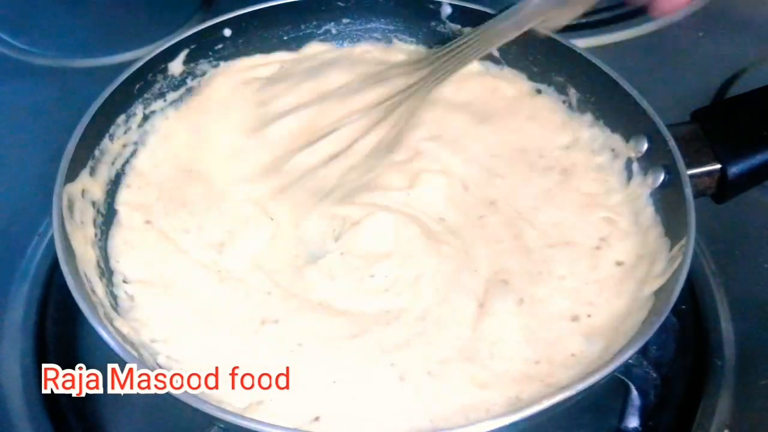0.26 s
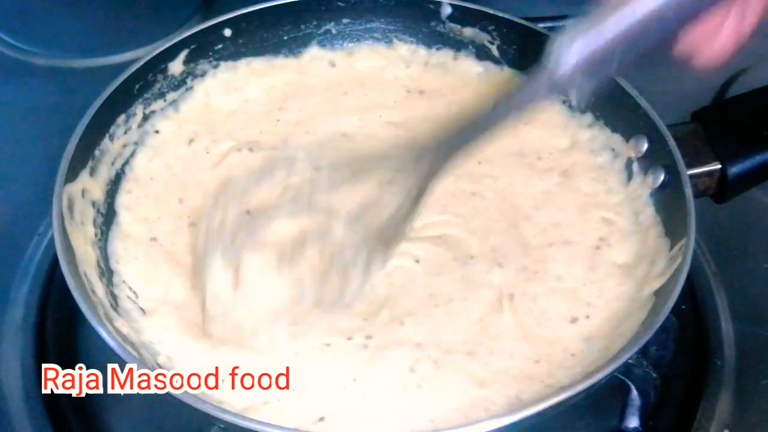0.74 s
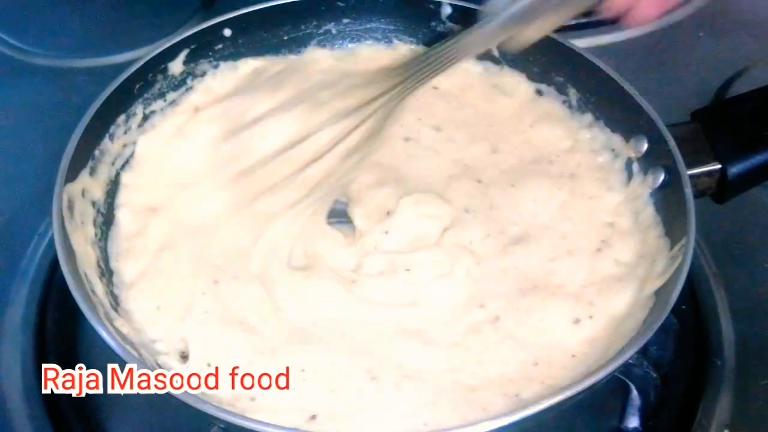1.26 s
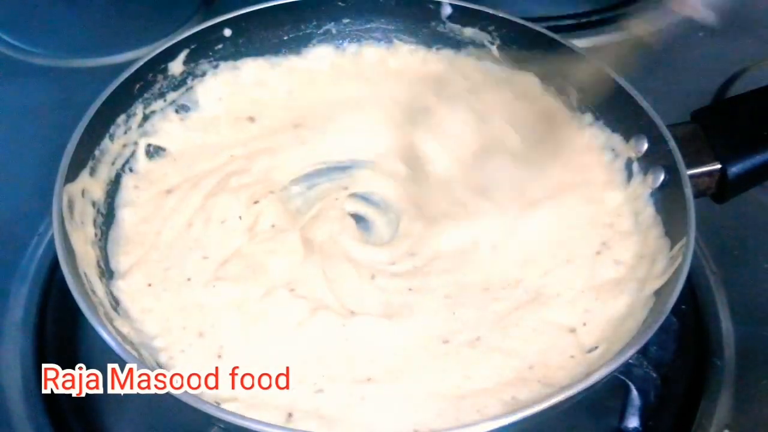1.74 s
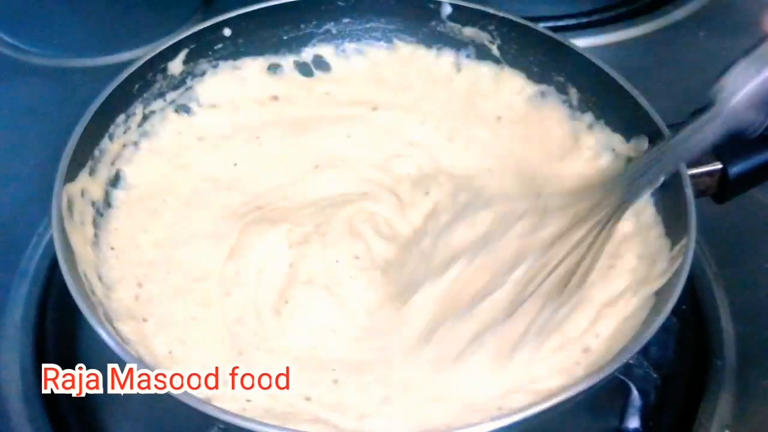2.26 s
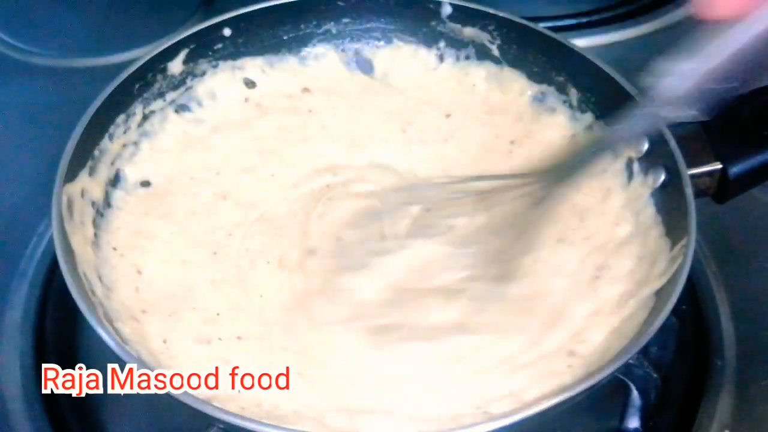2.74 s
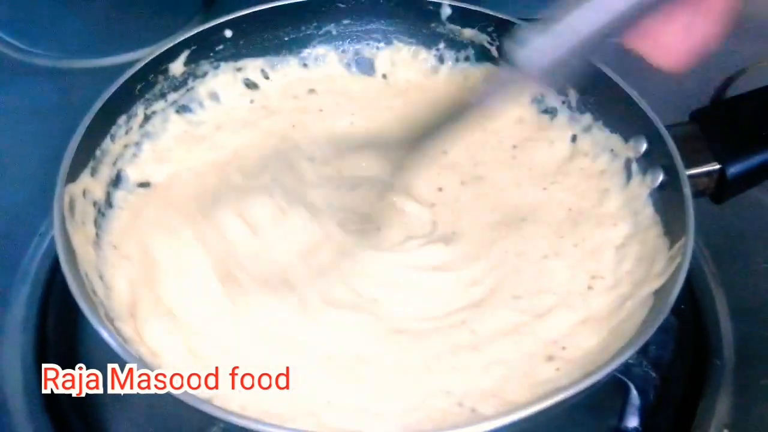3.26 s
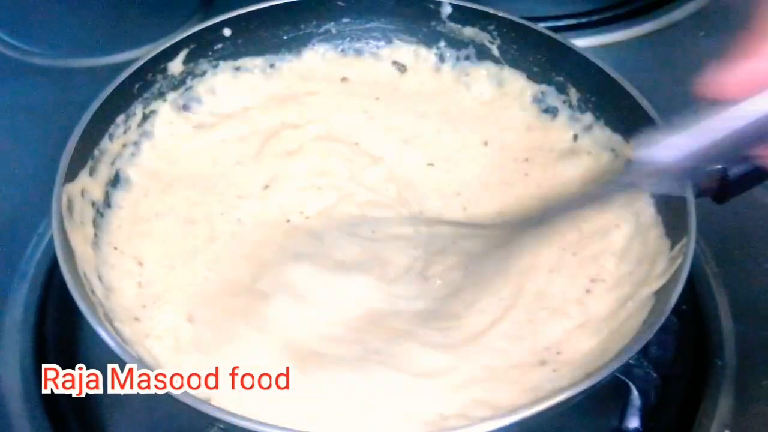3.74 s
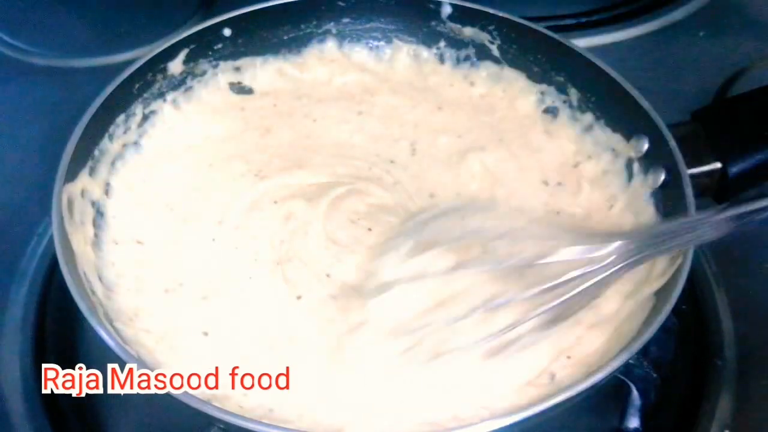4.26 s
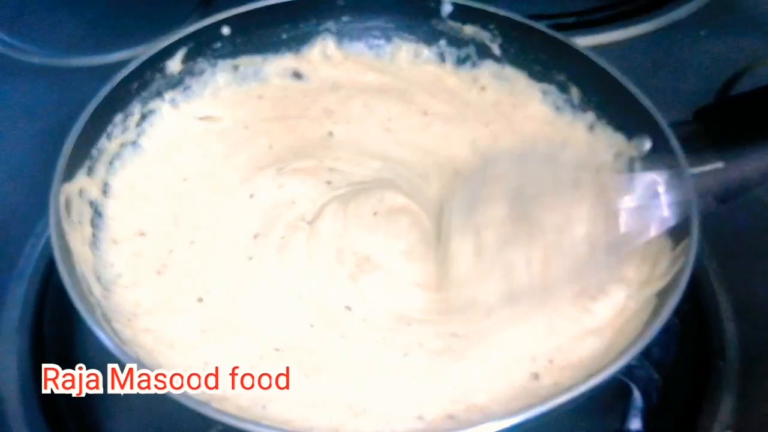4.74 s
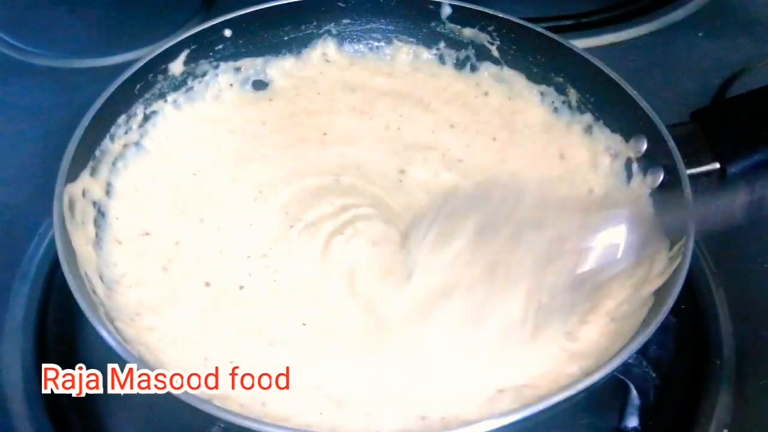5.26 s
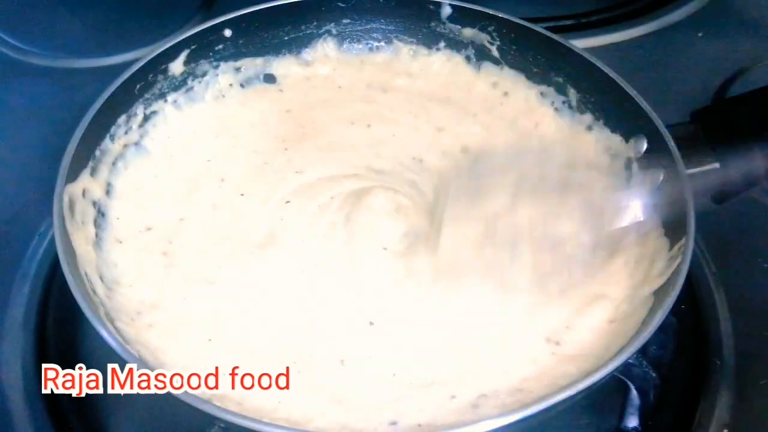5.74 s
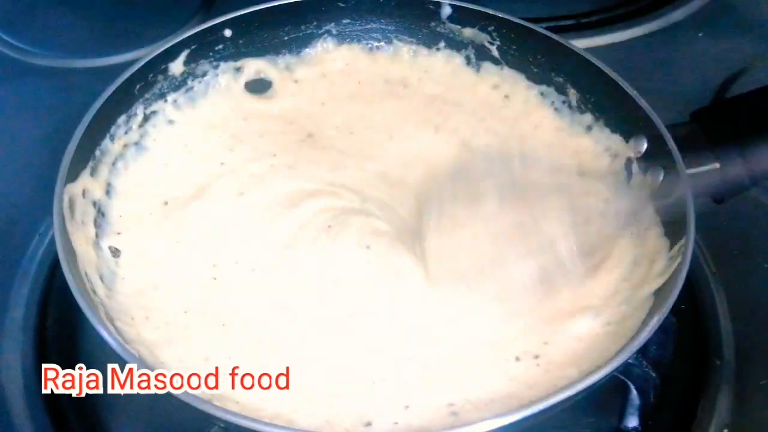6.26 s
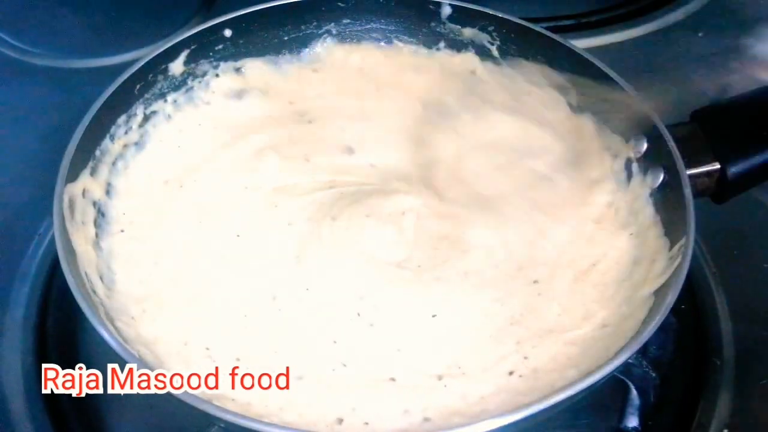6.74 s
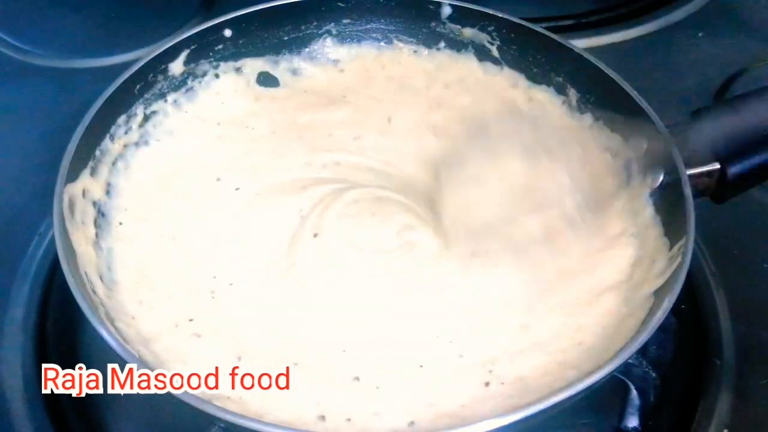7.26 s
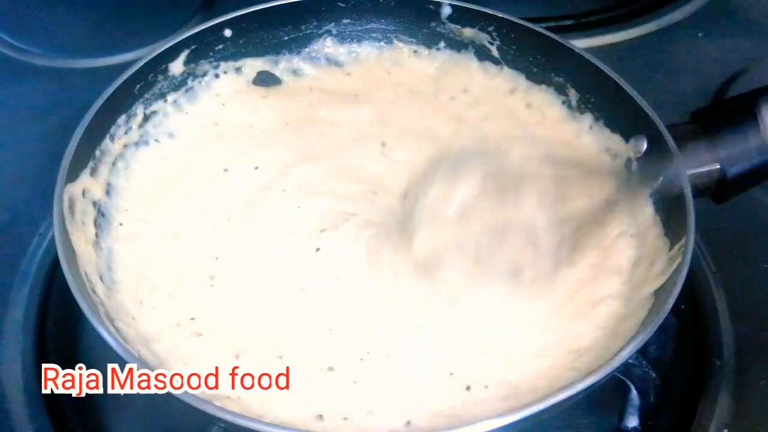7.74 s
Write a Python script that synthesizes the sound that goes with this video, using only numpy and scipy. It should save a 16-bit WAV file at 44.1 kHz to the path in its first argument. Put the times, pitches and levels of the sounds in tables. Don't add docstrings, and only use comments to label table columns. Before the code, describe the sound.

Brisk, rasping whisk strokes drag over a pan floor, with light ticks, small wet plops and a faint low hob drone.

```python
import sys
import numpy as np
from scipy import signal
from scipy.fft import rfft, irfft, next_fast_len
from scipy.io import wavfile
from scipy.ndimage import uniform_filter1d, map_coordinates

SR = 44100
rng = np.random.default_rng(int(sys.argv[2]) if len(sys.argv) > 2 else 0)


def log_audio(samples):
    frames = np.atleast_2d(samples).T
    limited = np.clip(frames, -1, 1)
    pcm = np.round(limited * 32767).astype(np.int16)
    wavfile.write(sys.argv[1], SR, pcm)


def voltage_ratio(decibels):
    exponent = np.asarray(decibels, float) / 20
    return 10 ** exponent


N = 353241
TOP_HZ = 14080


def unit(x):
    return x / np.sqrt(np.mean(x ** 2) + 1e-20)


def along(points, hz):
    f, v = np.transpose(points)
    return np.interp(np.log(hz + 1), np.log(f + 1), v)


def notch(hz, centre_hz, width_hz, depth):
    return depth / (1 + ((hz - centre_hz) / width_hz) ** 2)


def wobble(db, rate):
    knots = rng.standard_normal((3, 400))
    coarse = np.arange(0, N, 32)
    slow = [map_coordinates(0.9 * knots[0] + 0.45 * k, [coarse * rate / SR]) for k in knots[1:]]
    return np.repeat(voltage_ratio(db * np.array(slow)), 32, axis=1)[:, :N]


def swells(rows):
    t = np.arange(0, N + 32, 32) / SR
    bumps = sum(voltage_ratio(db) * np.exp(-((t - s) / half) ** 2) for s, half, db in rows)
    return np.interp(np.arange(N) / SR, t, bumps)


def filtered(x, response):
    m = next_fast_len(N + SR // 2)
    return irfft(rfft(x, m) * response(np.fft.rfftfreq(m, 1 / SR)), m)[..., :N]


def ring(x, modes, swing_db, rate):
    out, power = 0, 1e-20
    for hz, width, db in modes:
        r = np.exp(-np.pi * width / SR)
        drive = x * voltage_ratio(db) * wobble(swing_db, rate) * np.sqrt(width * (1 - r * r) / 2)
        out = out + signal.lfilter([1, 0, -1], [1, -2 * r * np.cos(2 * np.pi * hz / SR), r * r], drive)
        power += width * voltage_ratio(db) ** 2
    return out / np.sqrt(power)


def patchy(x, db):
    z = signal.stft(x, nperseg=512)[2]
    field = rng.standard_normal((3, *z.shape[1:]))
    field = uniform_filter1d(uniform_filter1d(field, size=2, axis=1), size=9, axis=2)
    gain = voltage_ratio(db * unit(field[0] + 0.69 * field[1:]))
    return signal.istft(z * unit(gain), nperseg=512)[1][:, :N]


def grit(shared, spike_db, turns):
    a = rng.standard_normal((3, N))
    grains = unit(uniform_filter1d(rng.standard_normal(N), size=60))
    knots = rng.standard_normal(90)
    knot_hz = np.linspace(0, SR / 2, len(knots))
    other = filtered(a[0], lambda hz: np.exp(2j * np.pi * turns * np.interp(hz, knot_hz, knots)))
    common = np.array([other, a[0]])
    return unit((np.sqrt(shared) * common + np.sqrt(1 - shared) * a[1:]) * voltage_ratio(spike_db * grains))


# pitch_hz [Hz], density_db [dB per Hz]
AIR_COLOUR = [(12, -12), (20, -2), (96, -5), (119, -6.5), (185, -10), (279, -12), (511, -14), (555, -15.5),
              (911, -20.5), (1760, -22.5), (2660, -22), (4600, -25), (5280, -25.5), (14200, -39)]
# pitch_hz [Hz], likeness [0-1]
AIR_LIKENESS = [(60, 0.36), (180, 0.56), (530, 0.37), (1590, 0.22), (4760, 0.14), (14200, 0.26)]


def background():
    air = filtered(rng.standard_normal((2, N)), lambda hz: voltage_ratio(along(AIR_COLOUR, hz)))
    turn = lambda hz: np.arccos(np.clip(along(AIR_LIKENESS, hz), -1, 1)) / 2
    mid = filtered(air[0], lambda hz: np.cos(turn(hz)))
    side = filtered(air[1], lambda hz: np.sin(turn(hz)))
    level_db = -61.5
    return voltage_ratio(level_db) * wobble(1.6, 4) * unit(np.array([mid + side, mid - side]))


# pitch_hz [Hz], wander_hz [Hz]
HOB_TONES = [
    (164, 7),
    (186, 8),
]
# centre_s [s], half_length_s [s], lower_tone_db [dB], upper_tone_db [dB]
HOB_SWELLS = [(0.206, 0.029, -71, -83), (0.531, 0.089, -63, -70), (1.2, 0.38, -72, -91),
              (1.767, 0.058, -69, -68.5), (2.554, 0.081, -69, -68), (2.986, .09, -62, -62.5),
              (3.41, 0.084, -83, -72), (3.864, 0.12, -64, -66.5), (4.52, 0.16, -71, -69.5),
              (5.143, 0.1, -60, -70), (5.618, 0.4, -61, -63), (6.092, 0.16, -57.5, -65),
              (6.324, 0.17, -80, -57.5), (6.697, 0.45, -73, -71), (7.186, 0.18, -77, -63),
              (7.408, 0.15, -58, -71), (7.91, 0.052, -59, -59)]


def hob():
    out, idle_db = 0, -88.5
    for k, (hz, wander_hz) in enumerate(HOB_TONES):
        level = voltage_ratio(idle_db) + swells([(s, half, tone_db[k]) for s, half, *tone_db in HOB_SWELLS])
        pitch = hz + wander_hz * np.log(wobble(20 / np.log(10), 20)[0])
        out = out + level * wobble(4, 24) * np.sin(2 * np.pi * np.cumsum(pitch) / SR)
    return out


# pitch_hz [Hz], t60_s [s]
KITCHEN_DECAY = [(300, 0.34), (3000, 0.4), (12000, 0.12)]


def kitchen(x):
    hz, t, z = signal.stft(rng.standard_normal((2, SR // 3)), SR, nperseg=256)
    tail = signal.istft(z * voltage_ratio(-60 * t / along(KITCHEN_DECAY, hz)[:, None]), SR, nperseg=256)[1]
    return signal.fftconvolve(x, tail / np.linalg.norm(tail[0]), axes=1)[:, :N]


# start_s [s], peak_db [dB], pitch_hz [Hz], spit_db [dB relative]
SAUCE_PLOPS = [
    (0.074, -42, 400, -12),
    (0.476, -39, 410, -29),
    (1.322, -47, 1640, -6),
    (2.936, -35, 1520, -28),
    (5.183, -47, 810, 5.5),
    (5.194, -42, 746, -2),
]


def sauce():
    out, t = np.zeros((2, N + SR)), np.arange(SR // 10) / SR
    spit_band = signal.butter(2, [2500, 9000], "band", fs=SR)
    for s, db, hz, spit_db in SAUCE_PLOPS:
        pocket = voltage_ratio(-60 * t / 0.013) * np.sin(2 * np.pi * hz * t * (1 + 12 * t))
        hiss = signal.lfilter(*spit_band, rng.standard_normal((2, len(t))))
        spit = voltage_ratio(spit_db - 60 * t / 0.029) * hiss
        out[:, round(s * SR):][:, :len(t)] += voltage_ratio(db - 0.5) * (pocket + spit)
    return out[:, :N]


# pitch_hz [Hz], width_hz [Hz], level_db [dB]
PAN_MODES = [
    (325, 17, 0),
    (574, 20, 0),
    (725, 59, 0),
]
# centre_s [s], level_db [dB], half_length_s [s]
MOAN_DRAGS = [
    [(.9, -63, 0.035), (6.65, -69.5, 0.25), (7.4, -65.5, 0.034), (7.95, -64, 0.1)],
    [(.85, -63, 0.1), (1.58, -72, 0.043), (1.95, -69.5, 0.038), (3.95, -65.5, 0.062), (7.05, -62, 0.076),
     (7.55, -72, 0.066)],
    [(.85, -60.5, 0.072), (1.5, -58.5, 0.062), (1.92, -62, 0.13), (2.2, -65, 0.036), (2.65, -70, 0.031),
     (4.87, -65, 0.04), (7.95, -64.5, .05)],
]


def pan_moans():
    out = 0
    for mode, drags in zip(PAN_MODES, MOAN_DRAGS):
        pull = swells([(s, half, db) for s, db, half in drags])
        out = out + ring(pull * grit(shared=0.92, spike_db=-4.5, turns=0), [mode], swing_db=1.0, rate=4.0)
    return out


# time_s [s], flat_share [0-1]
GRIP_TILT = [
    (0, 0),
    (4.0, 0.83),
    (4.7, 1),
    (8.01, 0.93),
]


def flat_share():
    return np.interp(np.arange(N) / SR, *np.transpose(GRIP_TILT))


# pitch_hz [Hz], density_db [dB per Hz]
FRICTION_COLOUR = [(290, -20), (500, -24), (560, -13), (682, -19.5), (721, -14), (943, -26), (1460, -23),
                   (1880, -6), (2560, -8.5), (4080, -2.5), (6500, -3.5), (8370, -6.5), (9370, -45),
                   (13500, -68), (14500, -42)]
# centre_s [s], half_length_s [s], upper_db [dB], lower_db [dB relative to upper]
WIRE_SINGS = [
    (0.0, 0.088, -57, 0),
    (0.492, 0.071, -61, 0.5),
    (1.118, 0.088, -65, 1),
    (2.383, 0.088, -58.5, 0),
    (4.608, 0.077, -64, -20),
    (5.028, 0.09, -53, -19),
]
# pitch_hz [Hz], width_hz [Hz], level_db [dB]
STEEP_WIRES = [(4750, 36, -16), (5040, 73, -14.5), (4750, 98, -17)]
FLAT_WIRES = [(4300, 80, 0), (5350, 140, 3)]
WIRE_LOOP = [(2556, 32, 0)]


def lifted_wires():
    upper = swells([(s, half, db - 3.0) for s, half, db, _ in WIRE_SINGS])
    lower = swells([(s, half, db + low_db - 3.5) for s, half, db, low_db in WIRE_SINGS])
    push = grit(shared=0.59, spike_db=0.5, turns=0.79)
    flat = flat_share() > 0.5
    steep_hum = ring(upper * push * ~flat, STEEP_WIRES, swing_db=5, rate=11.26)
    flat_hum = ring(upper * push * flat, FLAT_WIRES, swing_db=2.5, rate=9.1)
    loop_hum = ring(lower * push, WIRE_LOOP, swing_db=6.0, rate=14.13)
    swish = filtered((upper + lower) * push, lambda hz: voltage_ratio(along(FRICTION_COLOUR, hz) - 3.0) * (hz > 1200))
    return steep_hum + flat_hum + swish + loop_hum


# start_s [s], peak_db [dB], t60_s [s]
PAN_LANDINGS = [(0.543, -18.5, 0.037), (1.3233, -32.5, 0.041), (1.41, -41, 0.05), (1.846, -34, 0.037),
                (2.103, -19.5, 0.037), (2.2727, -29, 0.052), (2.531, -16.5, 0.065), (3.105, -25.5, 0.058),
                (3.3682, -25, 0.044), (3.5307, -48, 0.043), (4.526, -41, 0.053), (4.669, -27.5, 0.048),
                (5.41, -58, 0.018), (5.715, -51, 0.11), (5.456, -39, 0.077), (5.766, -38, 0.044),
                (6.099, -31, 0.045)]
# fastest_s [s], speeding_up_s [s], slowing_down_s [s], scrape_db [dB], pan_floor_db [dB
STROKE_DRAGS = [(0.658, 0.64, 0.048, -40, -8), (.78, 0.13, 0.15, -43, -8.5), (.9, 0.13, 0.051, -50, -8.5),
                (1.5, .1, 0.069, -40.5, -7), (1.61, .14, 0.1, -37, -14), (1.78, 0.093, 0.35, -56.5, 0),
                (1.99, 0.32, 0.1, -36.5, -13), (2.12, 0.05, 0.036, -38.5, -10.5),
                (2.22, 0.083, 0.076, -43, -7.5), (2.358, 0.22, 0.12, -37.5, -17.5),
                (2.55, 0.07, 0.082, -43.5, -10.5), (2.65, 0.042, 0.027, -47, -4),
                (2.789, 0.16, 0.1, -36.5, -15.5), (2.93, 0.038, 0.096, -59, -8), (3.23, 0.22, .12, -38, -11),
                (3.389, 0.075, 0.066, -46, -12), (3.681, 0.44, 0.22, -40.5, -10.5),
                (3.9, 0.03, 0.056, -60, -6), (4.03, 0.15, .11, -43.5, -6), (4.248, 0.16, 0.086, -41, -11),
                (4.685, .03, 0.05, -53, 0), (4.888, 0.21, 0.12, -40, -12), (5.89, 0.17, 0.081, -38, -13.5),
              (6.18, 0.13, 0.1, -36.5, -12), (6.431, 0.2, 0.18, -39.5, -10),
              (6.585, 0.015, 0.057, -48, -14), (6.69, .1, 0.12, -37, -11.5),
              (6.95, 0.16, 0.18, -37.5, -11.5), (7.11, 0.07, 0.095, -51.5, -25),
              (7.32, 0.095, 0.016, -53, 1.5), (7.489, 0.17, 0.16, -37.5, -15),
              (7.749, 0.081, 0.1, -39.5, -12), (7.969, 0.17, 0.073, -40, -9.5)]


def drag(db, swell, pan, lag_s, idle_db):
    slow_db, roundness = 24, 1.92
    bite_s = 0.0048
    t = np.arange(0, N + 32, 32) / SR
    touch = np.array([0] + [row[0] for row in PAN_LANDINGS])
    force = voltage_ratio(idle_db)
    for s, rise, fall, scrape_db, pan_db in STROKE_DRAGS:
        off = np.abs(t - s - lag_s) / np.where(t < s + lag_s, rise, fall)
        since_touch = np.clip(t - touch[touch <= s].max(), 0, None)
        grip = 1 - np.exp(-since_touch / (bite_s + lag_s))
        force = force + grip * voltage_ratio(scrape_db + db + pan * pan_db - swell * slow_db * off ** roundness)
    return np.interp(np.arange(N) / SR, t, force)


def landings():
    lift, jolt, t = np.ones(N), np.zeros(N + SR), np.arange(SR // 5) / SR
    for s, db, t60 in PAN_LANDINGS:
        start = round(s * SR)
        lift[:start][::-1][:len(t)] *= np.clip(t / 0.05, 0.6, 1)
        blow = voltage_ratio(db - 23.5 - 60 * t / t60) * np.clip(t / 0.005, 0, 1)
        tick = voltage_ratio(db - 16 - 60 * t / 0.004)
        jolt[start:][:len(t)] += blow + tick
    return lift, jolt[:N]


# low_hz [Hz], high_hz [Hz]
PART_BANDS = [
    (3750, 9000),
    (250, 2000),
    (2000, 3750),
    (9000, 15000),
]
# level_db [dB], swell_share [ratio], pan_share [ratio], lag_s [s], idle_db [dB]
PART_DRAGS = [
    (-0.5, 1.017, 0, 0.0049, -74.5),
    (-0.78, 0.94, 1, 0.00066, -78.5),
    (-3, 1.23, 0.25, .008, -76),
    (-20, 1.3, -0.12, 0.021, -87),
]
PART_JOLT_DB = [6.5, -13, -1, -22]
PART_RING_DB = [-6, -2.5, -4.5, -5.5]
PART_FLAT_DB = [0.2, -0.98, 0.3, 0.44]
# pitch_hz [Hz], width_hz [Hz], level_db [dB]
STEEP_MODES = [(1460, 130, -6), (2520, 240, -1), (3400, 200, -5), (4250, 200, -9), (4950, 170, -3),
               (5460, 90, -2), (5980, 100, 0), (6230, 200, 1), (6700, 130, 0), (7160, 120, -1),
               (7710, 100, -5), (8150, 260, -8), (10000, 310, -13)]
FLAT_MODES = [(1640, 16, -17.5), (2230, 8.7, -1), (2500, 12, -20), (2794, 330, 6), (3600, 28, 17),
              (4000, 49, -18), (4570, 40, -12), (5400, 60, 1), (5875, 110, -1), (6556, 810, 3.5),
              (7100, 630, -1.5), (8390, 230, -13), (9770, 340, -15)]
# pitch_hz [Hz], width_hz [Hz], depth [0-1]
FLAT_HOLLOW = (3720, 330, .55)


def whisk():
    lift, jolt = landings()
    rough = grit(shared=0.36, spike_db=1.46, turns=0.85)
    flat = flat_share()
    out = 0
    parts = zip(PART_BANDS, PART_DRAGS, PART_JOLT_DB, PART_RING_DB, PART_FLAT_DB)
    for (lo, hi), part, jolt_db, ring_db, flat_db in parts:
        force = lift * drag(*part) + voltage_ratio(jolt_db) * jolt
        drive = rough * force * voltage_ratio(flat_db * flat)
        damped = lambda modes: [(hz, max(width, 70), db) for hz, width, db in modes if lo <= hz < hi]
        colour = lambda hz: voltage_ratio(along(FRICTION_COLOUR, hz)) * (hz >= lo) * (hz < hi)
        size = np.sqrt(np.mean(colour(np.linspace(0, SR / 2, 2000)) ** 2))
        rush = filtered(drive * wobble(1.0, 16), colour) / size
        steep_ring = ring(drive * np.sqrt(1 - flat), damped(STEEP_MODES), swing_db=1.5, rate=9)
        flat_ring = ring(drive * np.sqrt(flat), damped(FLAT_MODES), swing_db=1.5, rate=11.0)
        out = out + voltage_ratio(-3.5) * rush + voltage_ratio(ring_db) * (steep_ring + flat_ring)
    return out - flat * filtered(out, lambda hz: notch(hz, *FLAT_HOLLOW))


def scene():
    near = patchy(whisk(), db=4.5) + lifted_wires() + pan_moans() + sauce()
    return near + voltage_ratio(-5.5) * kitchen(near) + hob() + patchy(background(), db=2.5)


def masked(x, under_db, rise_db, scatter_db):
    hz, _, z = signal.stft(np.array([x[0] + x[1], x[0] - x[1]]) / 2, SR, nperseg=2048, noverlap=1536)
    hz = hz[:, None]
    power = uniform_filter1d(uniform_filter1d(np.abs(z) ** 2, size=2, axis=1), size=2, axis=2)
    around = uniform_filter1d(np.sqrt(np.abs(power)), size=80, axis=1) ** 2
    patches = uniform_filter1d(rng.standard_normal(z.shape[1:]), size=10, axis=0)
    patches = unit(uniform_filter1d(patches, size=5, axis=1))
    treble = np.clip(hz / 14000, 0, 1) ** 3
    limit = around * voltage_ratio(2 * (under_db + rise_db * treble + scatter_db * treble * patches))
    over = 4 * np.log(np.abs(power / (limit + 1e-30)) + 1e-9)
    keep = np.clip(over + (hz < 1300) * 99, 0, 1)
    steps = unit(np.repeat(rng.standard_normal(z.shape[2]), 4)[:z.shape[2]])
    edge_hz = TOP_HZ - 900 * steps.clip(0) ** 1.3
    keep = keep * (hz < edge_hz)
    mid, side = signal.istft(z * keep, SR, nperseg=2048, noverlap=1536)[1][:, :N]
    return np.array([mid + side, mid - side])


# pitch_hz [Hz], width_hz [Hz], depth [0-1]
HOUSING_DIPS = [(3900, 400, .45), (1960, 120, .3), (7550, 200, .42)]
# pitch_hz [Hz], left_minus_right_db [dB]
PORT_LEAN = [(60, -3.5), (95, 4.5), (150, -1.5), (240, 1), (370, -2.5), (590, 0.5), (920, -1.5), (1460, -1),
             (2300, -1), (3620, -1), (5710, -4.5), (9000, 1.5), (14200, -2.5)]


def microphone(x):
    housing = lambda hz: np.prod([1 - notch(hz, *dip) for dip in HOUSING_DIPS], axis=0) * (hz < TOP_HZ)
    lean = lambda hz: along(PORT_LEAN, hz) / 2
    return filtered(x, lambda hz: voltage_ratio([lean(hz), -lean(hz)]) * housing(hz))


def band_limit(x):
    return signal.sosfilt(signal.butter(12, 14800, fs=SR, output="sos"), x)


def record(dry):
    thinned = masked(microphone(dry), under_db=-3.6, rise_db=5.5, scatter_db=4)
    return band_limit(thinned)


dry = scene()
out = record(dry)
log_audio(out)
```